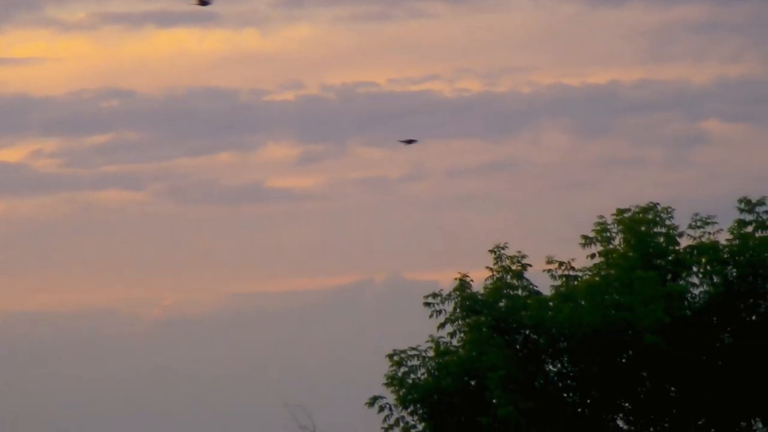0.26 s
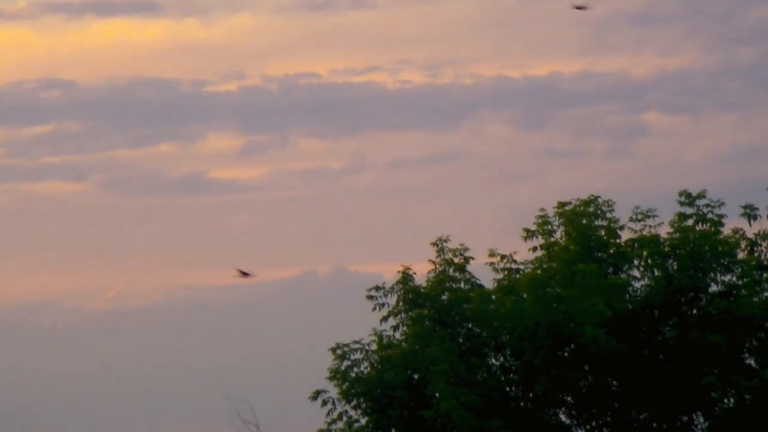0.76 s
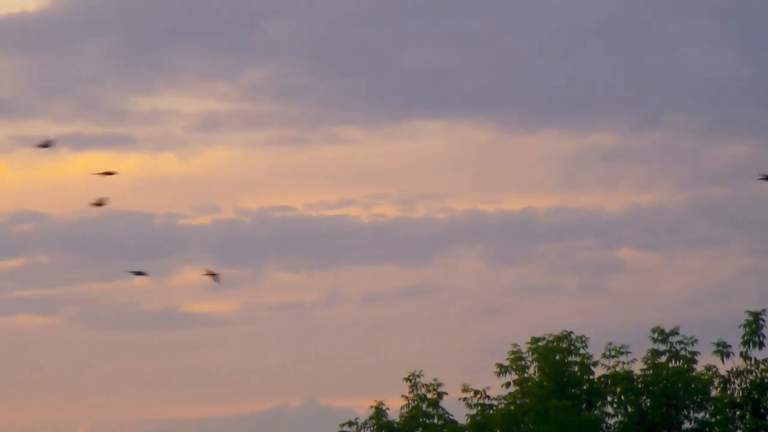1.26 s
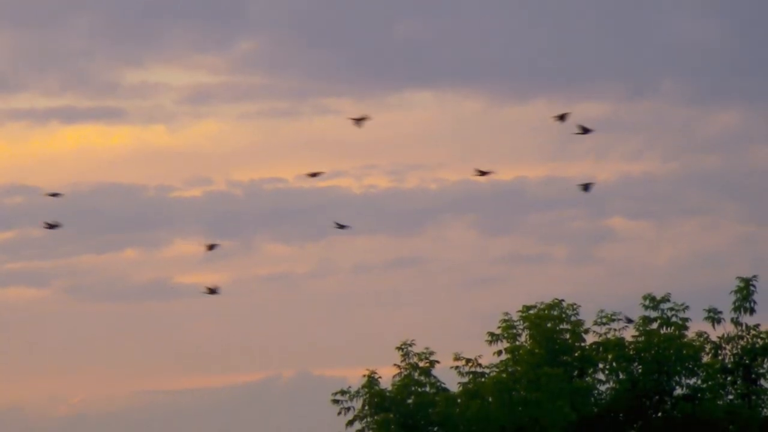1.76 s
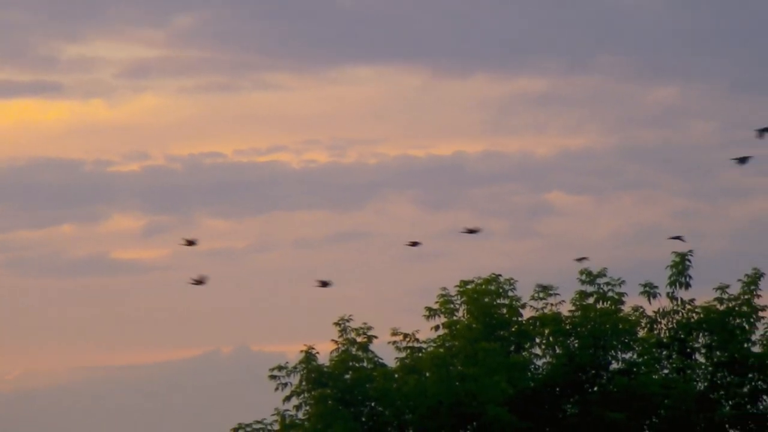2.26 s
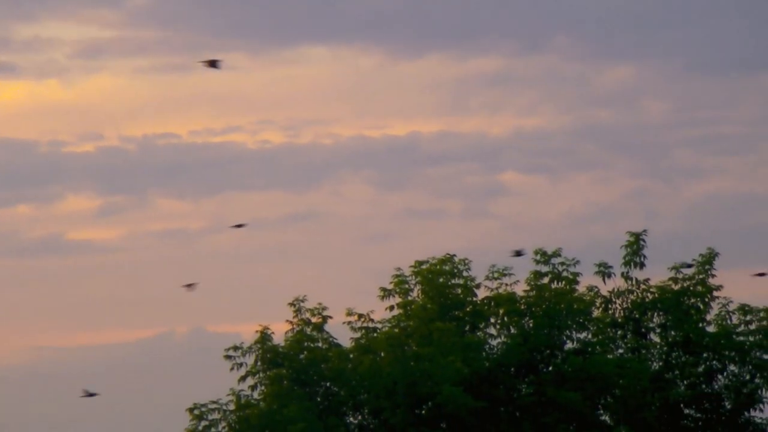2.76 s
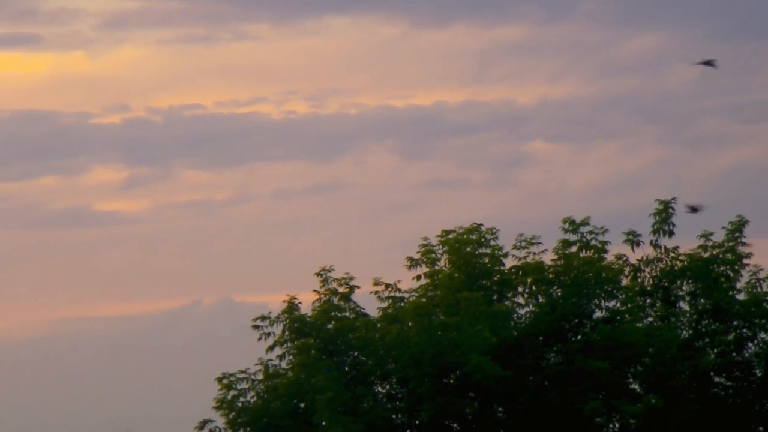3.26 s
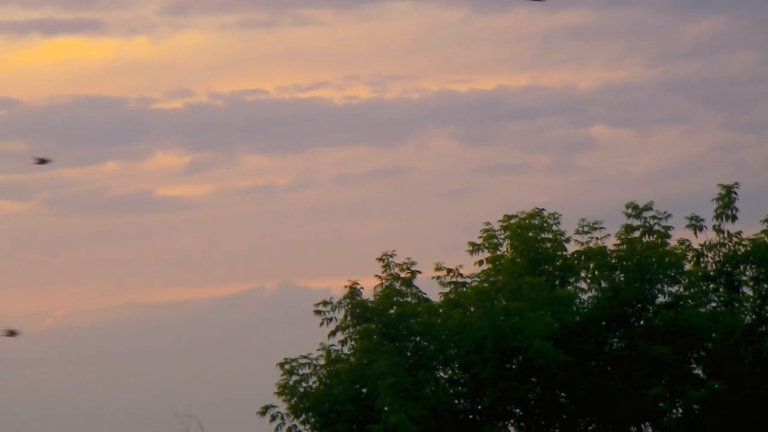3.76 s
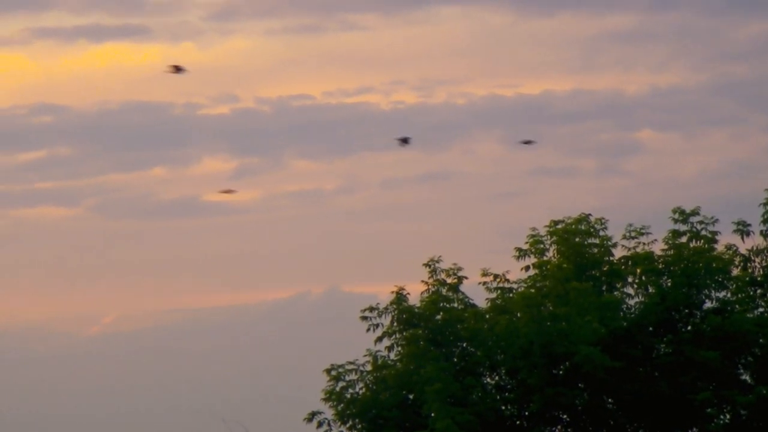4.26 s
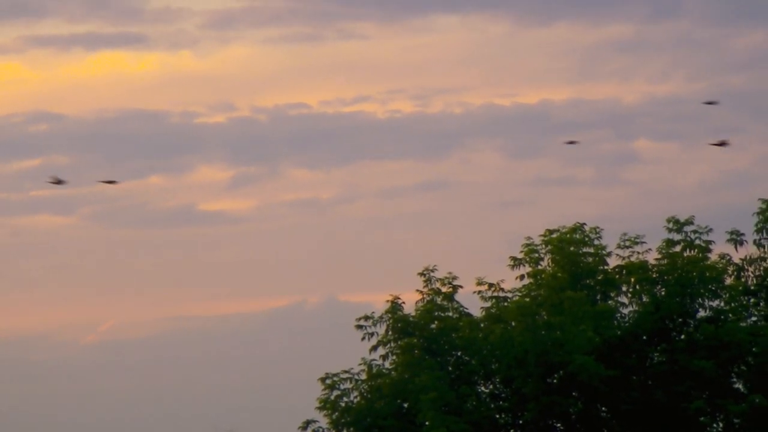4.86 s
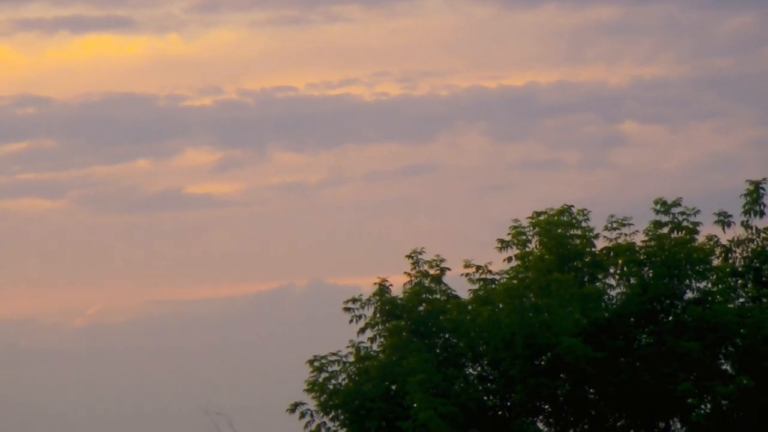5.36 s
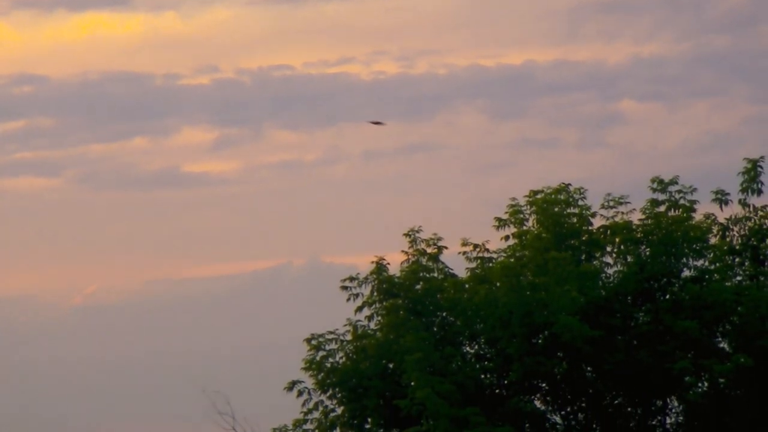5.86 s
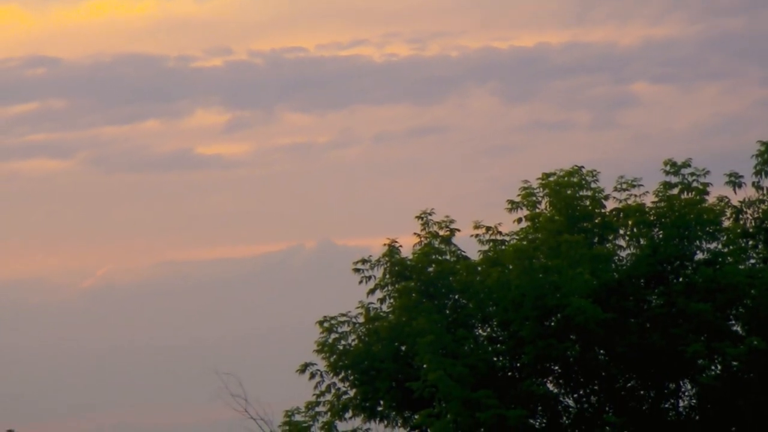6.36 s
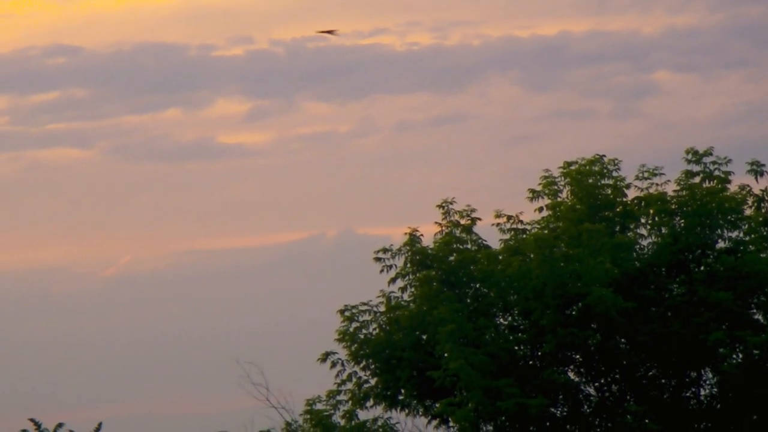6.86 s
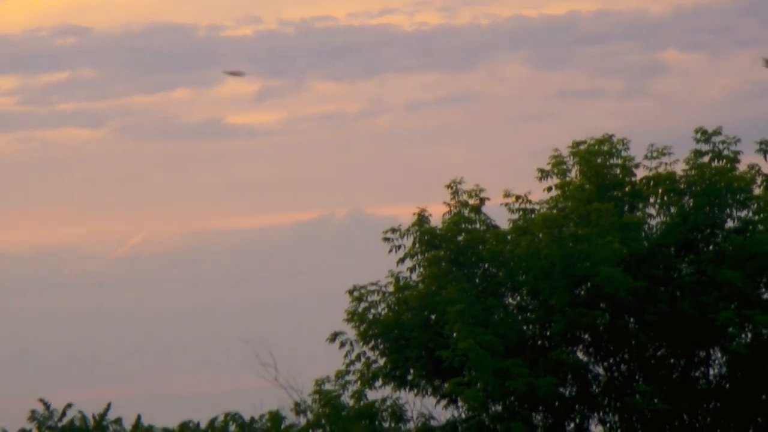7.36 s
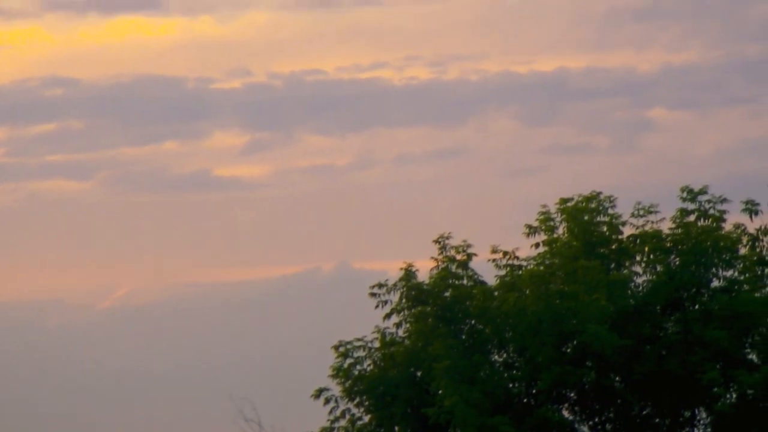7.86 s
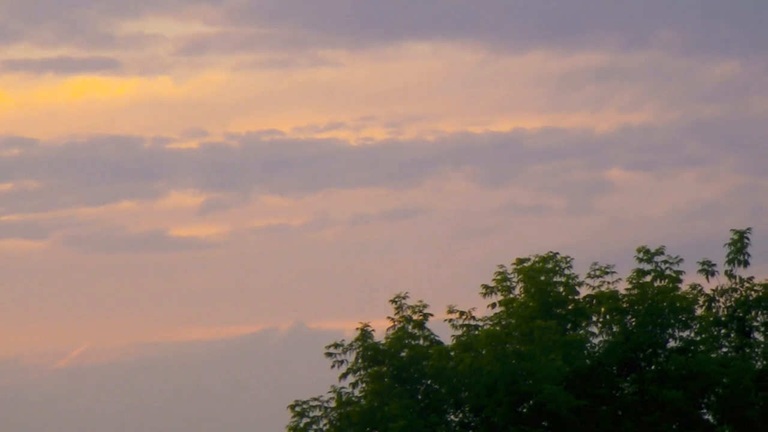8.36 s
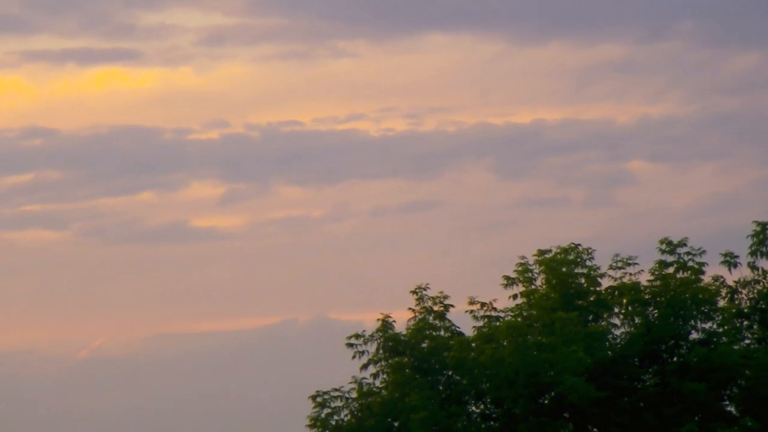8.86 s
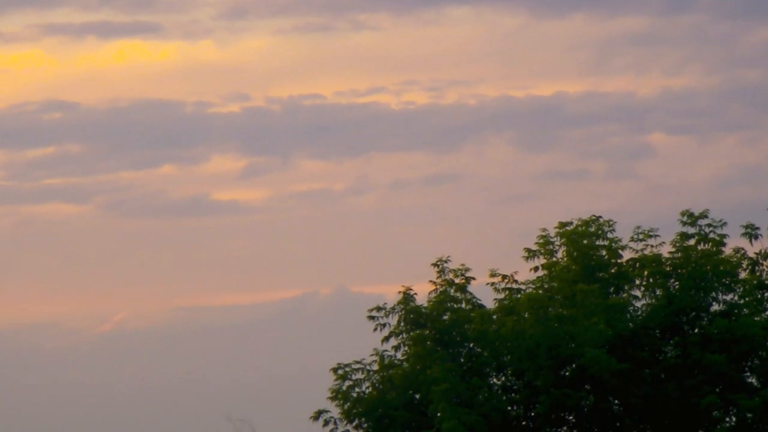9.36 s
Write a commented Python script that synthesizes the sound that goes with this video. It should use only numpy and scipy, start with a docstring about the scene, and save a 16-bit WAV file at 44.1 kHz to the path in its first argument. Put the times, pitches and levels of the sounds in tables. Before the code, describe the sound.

A flock of birds passes outdoors at dusk, giving very short, raspy, falling chacks, mostly several per second, irregular and sometimes bunched, some nearer and some faint. Each leaves a brief diffuse echo from trees. Beneath lies a steady distant machine rumble with wavering low tones. Faint high insect swells and rare thin whistles appear. A small microphone adds a boxy, nasal ring and light hiss.

```python
"""Small birds pass in a flock at dusk, giving short harsh calls that ring on among trees.
Each call is a stack of fluttering partials shaped by a sliding throat resonance; thin far whistles are warbling sines.
The trees answer with fading noise echoes. Far machinery hums and drones as coloured noise and wavering tones.
Insects sing high up as a narrow band of noise. A small microphone adds the ring of its cavity and some hiss."""
import sys
import numpy as np
from scipy import signal
from scipy.fft import rfft, irfft, next_fast_len
from scipy.io import wavfile
from scipy.ndimage import uniform_filter1d, map_coordinates

SR = 44100
rng = np.random.default_rng(int(sys.argv[2]) if len(sys.argv) > 2 else 0)


def inscribe(sig):
    """Save sig as 16-bit PCM at rate SR to the path in sys.argv[1].

    A 1-D sig is mono; a 2-D sig holds one channel per row.
    Samples are clipped to [-1, 1] before scaling.
    """
    pcm = np.round(np.clip(np.atleast_2d(sig).T, -1, 1) * 32767)
    wavfile.write(sys.argv[1], SR, pcm.astype(np.int16))


N = 424241  # length of the scene in samples

# The harsh bird calls. Each row: start in seconds, nominal length in seconds, level in dB (rms of the
# loudest 25 ms), throat resonance in Hz two fifths of the way through, strength of the overtones in dB.
BIRD_CALLS = [(0.065, 0.05, -40.5, 3490, -12), (0.393, 0.063, -43, 2730, -9),
              (0.476, 0.042, -52, 2970, -25), (0.507, 0.03, -45, 3320, -6),
              (0.543, 0.06, -48.5, 3090, -27.0), (0.574, 0.081, -37.5, 3710, -13.5),
              (0.645, 0.058, -39, 3390, -9), (0.902, 0.063, -39.5, 3600, -11),
              (0.961, 0.046, -40, 3150, -17.5), (1.08, 0.066, -41, 3380, -16.5),
              (1.341, 0.06, -37.5, 3720, -10), (1.405, 0.051, -38.5, 3650, -12),
              (1.451, 0.043, -43.5, 3470, -9), (1.562, 0.049, -51, 2620, -16.5),
              (1.647, 0.063, -40.5, 3820, -7), (2.148, 0.06, -38, 3530, -7),
              (2.204, 0.048, -38.5, 3140, -13), (2.328, 0.04, -50, 2950, -23),
              (2.345, 0.082, -38, 3340, -12), (2.469, 0.055, -37, 3520, -6.5),
              (2.587, 0.066, -39, 3480, -13), (2.679, 0.076, -49.5, 2970, -19),
              (2.773, 0.069, -39, 3450, -9), (2.858, 0.06, -36.5, 3590, -7), (2.949, 0.05, -40, 2780, -14),
              (3.128, 0.071, -38, 3560, -15), (3.184, 0.057, -47, 2860, -35),
              (3.255, 0.076, -36.5, 3260, -18.5), (3.367, 0.07, -40.5, 3380, -16.5),
              (3.457, 0.089, -37.5, 3510, -30), (3.579, 0.064, -36, 3570, -12),
              (3.884, 0.075, -39, 3370, -14), (4.058, 0.05, -40, 3350, -10),
              (4.219, 0.078, -39.5, 3440, -12), (4.305, 0.069, -40, 3360, -16.5),
              (4.365, 0.045, -47, 3580, -7), (4.4, 0.053, -44, 3430, -13), (4.432, 0.055, -47, 2970, -32),
              (4.477, 0.057, -37, 3280, -19.5), (4.53, 0.074, -40.5, 3460, -14),
              (4.605, 0.074, -47.5, 3040, -14), (4.819, 0.06, -51.5, 3540, -9),
              (4.95, 0.047, -50.5, 2520, -25), (5.049, 0.067, -41, 3330, -14), (5.095, 0.1, -45, 3510, -17),
              (5.169, 0.064, -46, 2960, -16.5), (5.359, 0.11, -44.5, 3520, -13),
              (5.457, 0.078, -46.5, 3270, -14), (5.753, 0.072, -39.5, 3340, -17.5),
              (5.83, 0.043, -44, 3120, -20), (5.882, 0.067, -47, 3370, -18.5),
              (6.155, 0.073, -42.5, 3760, -3), (6.233, 0.054, -37, 3570, -16.5),
              (6.343, 0.054, -47.5, 2800, -25), (6.495, 0.0526, -49, 2750, -22.5),
              (6.596, 0.078, -44.5, 3760, -10), (6.73, 0.057, -34, 3620, -12),
              (6.797, 0.043, -33.5, 3420, -12), (6.878, 0.061, -40, 3360, -22.5),
              (7.008, 0.063, -35.5, 3460, -13), (7.074, 0.041, -52, 2730, -20),
              (7.228, 0.046, -49, 2920, -2), (7.323, 0.052, -39, 3530, -12.5),
              (7.448, 0.057, -39, 3250, -12), (7.666, 0.073, -41.5, 3270, -11),
              (7.704, 0.06, -37.5, 3460, -10.5), (7.815, 0.055, -39, 3490, -11),
              (7.938, 0.061, -38.5, 3320, -19), (8.073, 0.11, -41.5, 3200, -19),
              (8.193, 0.06, -43.5, 2966, -13), (8.232, 0.097, -43.5, 3530, -12.0),
              (8.421, 0.11, -41, 3130, -11), (8.802, 0.07, -40, 3200, -17),
              (8.868, 0.068, -37.5, 3326, -19), (8.997, 0.062, -40.5, 3220, -21),
              (9.126, 0.057, -46.5, 3050, -20), (9.158, 0.055, -40.5, 3410, -18),
              (9.2, 0.043, -47, 2880, -32), (9.217, 0.064, -40, 3240, -25),
              (9.466, 0.075, -43.5, 3620, -28)]
# Thin far whistles. Each row: start in seconds, length in seconds, middle pitch in Hz, peak level in dB.
FAR_WHISTLES = [(1.26, .14, 8750, -55), (5.55, .25, 4050, -60), (5.72, .26, 4570, -57),
                (7.36, .2, 7800, -56), (8.12, .2, 8650, -57), (9.05, .14, 8720, -58)]
# Machine tones. Each row: middle pitch in Hz, width of its wander in Hz,
# then the middle level in dB at 0, 3, 6 and 9.6 seconds.
MACHINE_TONES = [(84.6, 8.27, -47.5, -43.5, -48, -61), (124.3, 3.85, -34, -37, -39.5, -58),
                 (144.3, 3.41, -37.5, -38, -68, -61), (156.7, 5.45, -44.5, -48, -42.5, -41),
                 (188.5, 4.7, -39, -71, -55.5, -37), (274.8, 6.08, -52, -59.5, -47.5, -51),
                 (354.6, 4.79, -58, -54.5, -51, -53.5), (707, 19.8, -62.5, -56.5, -65.5, -60.5)]
# Colour of the far machine rumble. Each row: frequency in Hz, relative level in dB.
RUMBLE_COLOUR = [(30, -16.5), (50, 0.5), (130, -0.5), (250, -6.5), (450, -17), (800, -21.5), (2000, -37),
                 (4500, -33.5), (9000, -52)]
# How the microphone housing rings. Each row: frequency in Hz, gain in dB.
HOUSING_RING = [(950, -1), (1080, 5), (1210, 15.5), (1340, 12.5), (1480, -1), (1640, 12), (3600, 5.5),
                (5050, 6), (5950, 2.5), (6250, 4.5), (7000, 2), (7400, -7.5), (7700, -7.5)]
# Colour of the preamplifier hiss. Each row: frequency in Hz, relative level in dB.
HISS_COLOUR = [(4000, -3.5), (14500, -5.5), (15600, -14)]
# Swells of the insect song. Each row: time of the peak in seconds, length in seconds.
INSECT_SWELLS = [(1.748, 0.22), (4.12, 0.2), (6.45, 0.32), (8.65, 0.48)]

TOP_HZ = 15700  # nothing passes the microphone at or above this
TREES_T60 = 0.43  # seconds for the echoes to fade by 60 dB
LEVEL_HZ, SLIDE = 2010, 0.8  # a throat at this Hz holds still; the slide down in Hz per Hz above it


def amp(db):
    """Turn dB into a gain."""
    return 10 ** (np.asarray(db) / 20)


def unit(x):
    """Scale x to an rms of 1."""
    return x / np.sqrt(np.mean(x ** 2) + 1e-20)


def along(points, hz):
    """Read a curve of (Hz, value) points, with frequency on a log axis."""
    f, v = np.transpose(points)
    return np.interp(np.log(hz + 1), np.log(f + 1), v)


def wobble(rate):
    """A smooth random curve with `rate` random points a second."""
    points = rng.standard_normal(int(N * rate / SR) + 4)
    return map_coordinates(points, [np.arange(N) * rate / SR])


def filtered(x, response):
    """Give each frequency of x the gain that response(hz) asks for."""
    size = next_fast_len(N + SR // 2)
    gain = response(np.fft.rfftfreq(size, 1 / SR))
    return irfft(rfft(x, size) * gain, size)[..., :N]


def noise(response):
    """Coloured noise with an rms of 1."""
    return unit(filtered(rng.standard_normal(N), response))


def chack(length, first_hz, last_hz, over_db, voice_hz=520, chest_db=-9, scoop=.22):
    """A rough voice: partials flutter in size and phase under a throat resonance that slides through the call."""
    u = np.arange(SR // 8) / (SR * length)  # time, where 1 is the nominal end
    soft = np.clip((-over_db - 16.5) / 4, 0, 1)  # 0 = a bright call that snaps, 1 = a round one that swells
    attack = np.sin(np.pi / 2 * np.clip(u / (0.18 + 0.088 * soft), 0, 1)) ** (1 + soft)
    effort = attack * amp(-45 * np.clip(u - .45, 0, None) ** 1.6)

    throat_hz = first_hz + (last_hz - first_hz) * np.clip(u, 0, 1)
    throat_hz *= 1 - scoop * soft * np.clip(1 - u / .45, 0, 1)  # a round call scoops up into its note

    # slow random curves: two for each of 24 partials, and one that shakes the pitch
    draw = rng.standard_normal((49, len(u)))
    span = round(.0038 * SR)
    smooth = uniform_filter1d(uniform_filter1d(draw, span), span // 2 + 1)
    re, im, shake = smooth[:24], smooth[24:48], unit(smooth[48])
    re[1:] += re.std() / 2  # the partials keep a little of their pitch
    # the note on the throat clears briefly at the height of the call, most in short calls
    steady = .17 / length * np.sin(np.pi * np.clip(u / .85, 0, 1)) ** 2
    re[0] += steady * re[0].std()

    # the pitch trembles, which smears the upper partials most
    pitch_hz = voice_hz * np.exp(.1 * draw[0, 0] + .032 * shake)
    hz = np.arange(len(re))[:, None] * pitch_hz
    hz[0] = throat_hz + voice_hz / 9 * shake  # the first row rides on the throat itself

    def peak(at, wide):
        """A resonance at a multiple of the throat frequency."""
        return np.exp(-.5 * (np.log(hz / (at * throat_hz)) / wide) ** 2)

    swell = amp(-8 * np.clip(1 - u / 2.2, 0, 1))  # the body of the call fills out late
    chest = amp(chest_db - 6 * soft) * np.clip(2 * u, 0, 1) * peak(.55, .55)
    body = peak(1, .17) + chest
    octave_at = 1.9 + soft * (.45 + .2 * np.clip(u, 0, 1))
    octave = peak(octave_at, .12 - .06 * soft) * amp(10 * soft)
    overtones = octave + amp(-4) * peak(2.7, .1)
    breath = amp(-4 * soft - 2 * u) * np.sqrt(swell) * peak(1.3, 0.64)  # air through the opening bill
    throat = swell * (body + amp(over_db) * overtones) + amp(over_db) * breath

    phase = 2 * np.pi * np.cumsum(hz, axis=1) / SR + np.arctan2(im, re)
    partials = throat * np.hypot(re, im) * np.cos(phase)
    call = effort * np.sum(partials, axis=0)
    loudest = np.sqrt(uniform_filter1d(call ** 2, SR // 40).max())
    return call / loudest


def flock():
    """Place the calls and whistles in time; throats that start out higher slide down further."""
    out = np.zeros(N + SR)
    for start, length, db, throat_hz, over_db in BIRD_CALLS:
        fall_hz = SLIDE * (throat_hz - LEVEL_HZ)
        call = chack(length, throat_hz + .4 * fall_hz, throat_hz - .6 * fall_hz, over_db)
        out[round(start * SR):][:len(call)] += amp(db) * call
    for start, length, pitch_hz, db in FAR_WHISTLES:
        u = np.linspace(0, 1, round(length * SR))
        warble_hz = 60 * np.sin(20 * u)
        phase = 2 * np.pi * np.cumsum(pitch_hz + warble_hz) / SR
        out[round(start * SR):][:len(u)] += amp(db) * np.sin(np.pi * u) * np.sin(phase)
    return out[:N]


def trees(x):
    """Scattered echoes from leaves and trunks; the birds move, so every stretch gets its own tail."""
    out = np.zeros(N + SR)
    step, delay = SR // 4, 400  # samples: one stretch, and the wait before its echoes
    for start in range(0, N, step):
        _, t, z = signal.stft(rng.standard_normal(SR // 2), SR, nperseg=256)
        fading = z * amp(-60 * t / TREES_T60)
        tail = signal.istft(fading, SR, nperseg=256)[1]
        echoes = signal.fftconvolve(x[start:start + step], tail / np.linalg.norm(tail))
        room = out[start + delay:]
        room[:len(echoes)] += echoes[:len(room)]
    return out[:N]


def machines():
    """A broad far rumble, plus sine tones that waver in pitch and swell and fade."""
    t = np.arange(N) / SR
    swell_db = .9 * wobble(4) + .9 * wobble(10)
    out = amp(-37.5 + swell_db) * noise(lambda hz: amp(along(RUMBLE_COLOUR, hz)))
    for tone_hz, width_hz, *db in MACHINE_TONES:
        phase = 2 * np.pi * np.cumsum(tone_hz + width_hz / 2 * wobble(9)) / SR
        level_db = np.interp(t, [0, 3, 6, 9.6], db) + 2.76 * wobble(5)
        out += amp(level_db) * np.sin(phase)
    return out


def insects(song_hz=5030, width_hz=160):
    """A far chorus: a narrow band of noise that swells now and then."""
    t = np.arange(N) / SR
    swells = sum(np.exp(-.5 * (2 * (t - peak) / length) ** 2) for peak, length in INSECT_SWELLS)
    song = noise(lambda hz: np.exp(-.5 * ((hz - song_hz) / width_hz) ** 2))
    return amp(-64.5) * (0.11 + swells) * song  # 0.11 keeps a faint song between swells


def scene():
    """Birds, their echoes and the evening background."""
    birds = flock()
    echoes = amp(-7.0) * trees(birds)
    return (birds + echoes + machines() + insects())[None]


def record(dry):
    """The housing colours the sound, the preamplifier hisses, and the band limit cuts off the top."""
    heard = filtered(dry, lambda hz: amp(along(HOUSING_RING, hz)))
    hiss = amp(-56.0) * noise(lambda hz: amp(along(HISS_COLOUR, hz)))
    return filtered(heard + hiss, lambda hz: hz < TOP_HZ)


dry = scene()
out = record(dry)
inscribe(out)
```